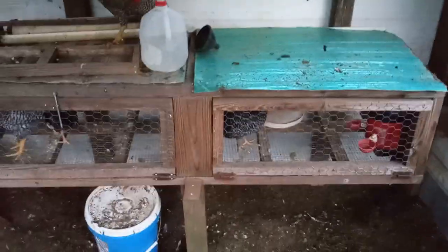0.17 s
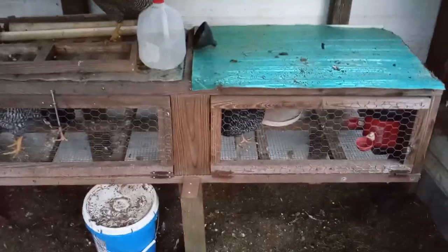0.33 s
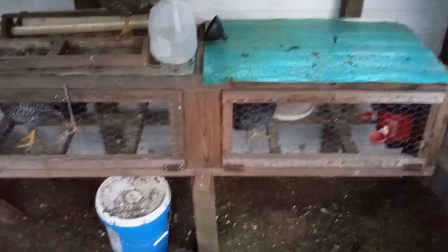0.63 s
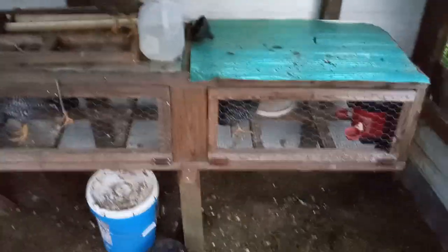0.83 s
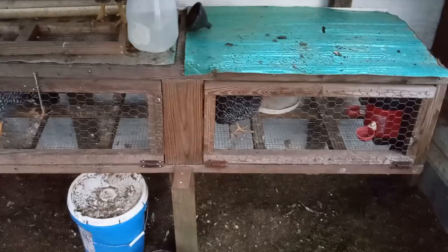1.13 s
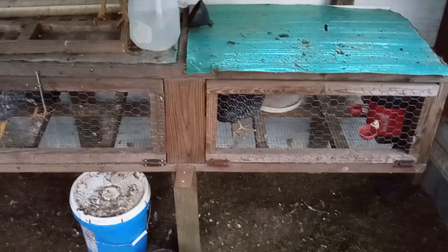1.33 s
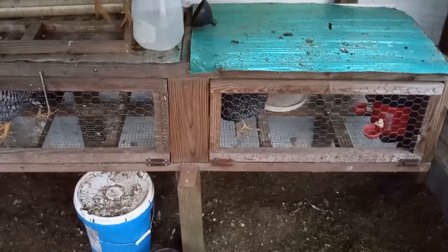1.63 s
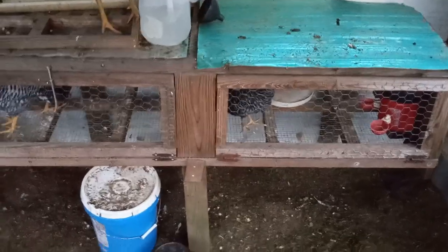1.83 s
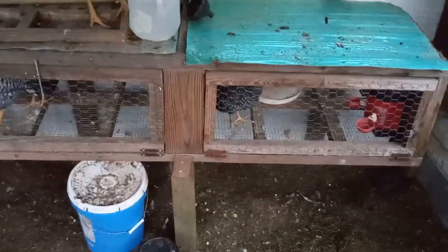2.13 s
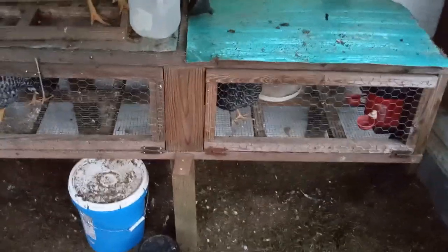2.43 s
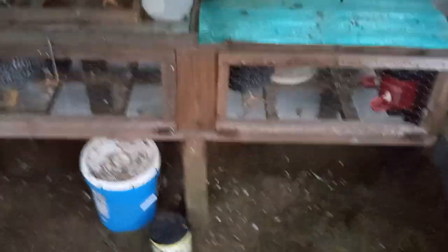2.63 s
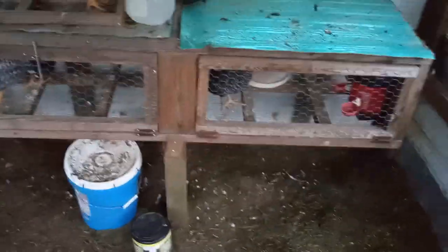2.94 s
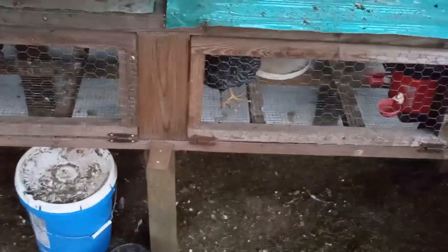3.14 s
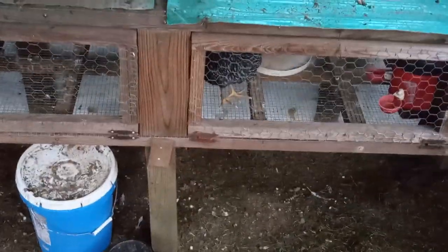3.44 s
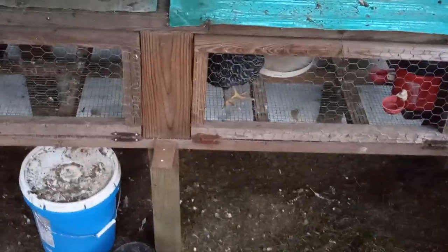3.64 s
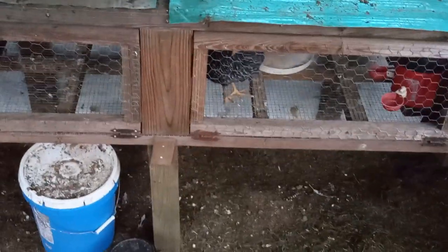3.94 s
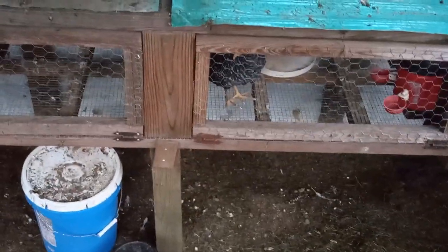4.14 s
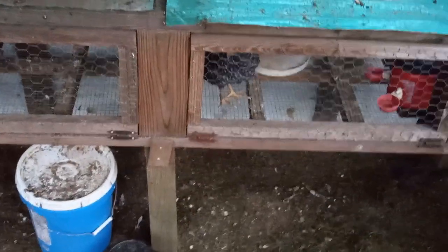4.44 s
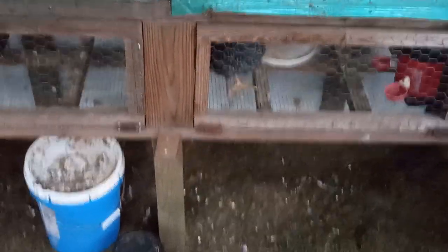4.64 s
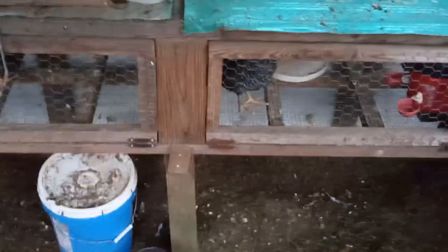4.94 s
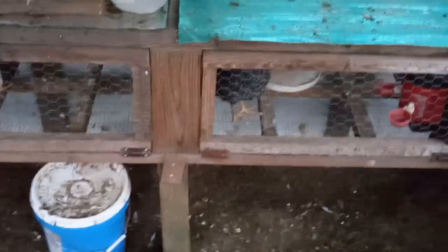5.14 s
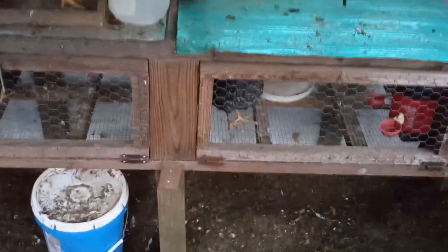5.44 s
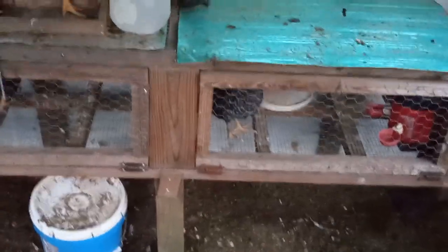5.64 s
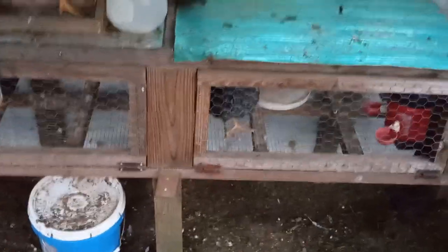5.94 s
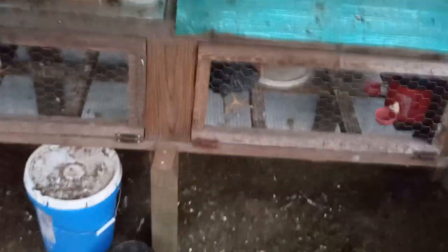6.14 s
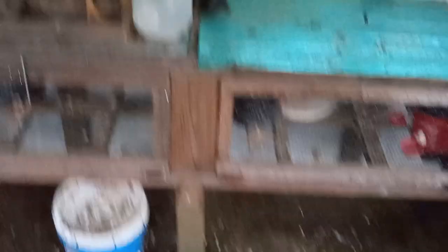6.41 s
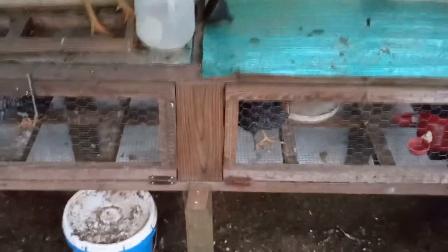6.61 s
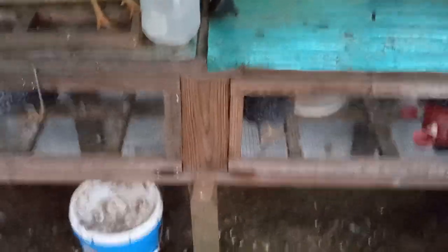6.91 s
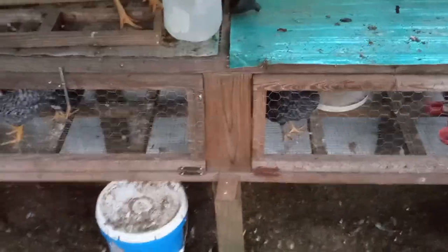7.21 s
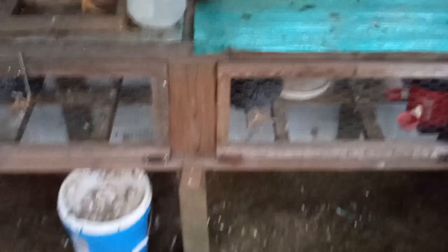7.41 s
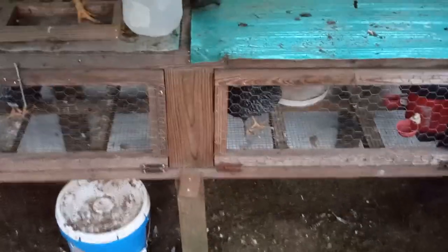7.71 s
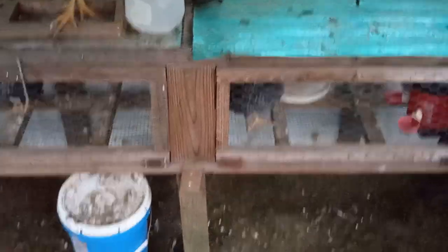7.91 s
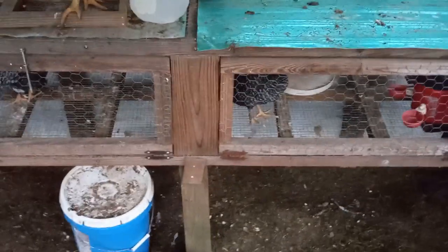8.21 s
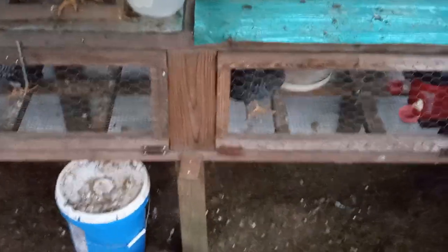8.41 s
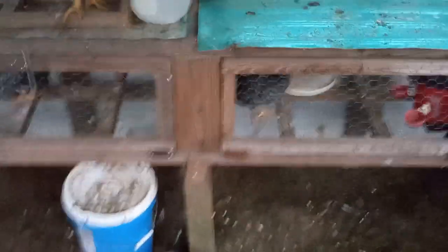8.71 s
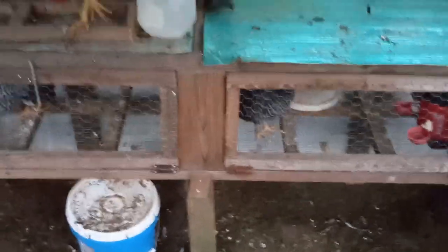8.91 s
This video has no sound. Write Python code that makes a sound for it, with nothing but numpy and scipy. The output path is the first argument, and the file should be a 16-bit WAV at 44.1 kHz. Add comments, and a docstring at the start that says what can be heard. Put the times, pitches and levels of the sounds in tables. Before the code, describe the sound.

Close by in a small shed, claws rattle wire mesh and bump wooden boards while young chickens peep and squawk, mostly on the left. A far bird chirps faintly and a hen clucks twice. Then comes a run of falling peeps and brief squawks with soft coos, followed by quick low clucks and one last knock and rattle. The handheld microphone picks up a few dull thumps and quiet outdoor hiss.

```python
"""Young chickens peep and squawk in a wood and wire hutch inside a shed; a hen clucks, with soft coos.
Peeps are falling, nearly pure tones shaped by the throat; squawks are membrane pulses that break into
a rasp. Feet ring the boards and rattle the mesh; handling of the microphone adds low, dull thumps.
A far bird chirps over a low hum and the hiss of the yard."""
import sys
import numpy as np
from scipy import signal
from scipy.fft import rfft, irfft, next_fast_len
from scipy.io import wavfile
from scipy.ndimage import uniform_filter1d

SR = 44100
rng = np.random.default_rng(int(sys.argv[2]) if len(sys.argv) > 2 else 0)


def transcribe(signal):
    """Save signal, clipped to [-1, 1], as a 16-bit WAV file at the path in sys.argv[1]."""
    frames = np.atleast_2d(signal).T
    limited = np.clip(frames, -1, 1)
    pcm = np.round(limited * 32767).astype(np.int16)
    wavfile.write(sys.argv[1], SR, pcm)


N = 399546


def from_db(db):
    return 10 ** (np.asarray(db) / 20)


def unit_rms(x):
    return x / np.sqrt(np.mean(x ** 2) + 1e-20)


def phase_of(hz):
    return 2 * np.pi * np.cumsum(hz) / SR


def at_hz(points, hz):
    points = np.array(points)
    return np.interp(np.log(hz), np.log(points[:, 0]), points[:, 1])


def span(rows):
    """Samples covered by timed rows, an edge fade, and the interpolated columns."""
    s, *columns = np.transpose(rows)
    at = np.arange(max(round(s[0] * SR), 0), min(round(s[-1] * SR), N))
    fade = np.clip(np.minimum(at - at[0], at[-1] - at) / (0.0051 * SR), 0, 1)
    return at, fade, [np.interp(at / SR, s, c) for c in columns]


def drift(rate_hz, size):
    """Low-passed noise, RMS 1."""
    r = np.exp(-2 * np.pi * rate_hz / SR)
    return unit_rms(signal.lfilter([1], [1, -2 * r, r * r], rng.standard_normal(size + 9000))[9000:])


def band(x, low_hz, high_hz):
    edges = [max(low_hz, 10), min(high_hz, SR * .45)]
    return signal.sosfilt(signal.butter(2, edges, "band", fs=SR, output="sos"), x)


def around(x, hz, width_hz):
    return band(x, hz - width_hz / 2, hz + width_hz / 2)


def third_octaves(noises, spectrum, lowest_hz):
    """Yields (centre Hz, weighted band), alternating between two noises."""
    for k, low in enumerate(lowest_hz * 2 ** np.arange(0, np.log2(16500 / lowest_hz), 1 / 3)):
        hz = low * 2 ** (1 / 6)
        yield hz, from_db(at_hz(spectrum, hz)) * band(noises[k % 2], low, low * 2 ** (1 / 3))


def spread(pair, correlation):
    """Stereo from a shared and an opposed part."""
    return np.sqrt(1 + correlation) * pair[0] + np.sqrt(1 - correlation) * pair[1] * [[1], [-1]]


# Throat response. Each row: frequency in Hz, gain in dB.
THROAT_GAINS = [(1000, 2), (1350, 3), (1600, 5.5), (1850, 0.5), (2150, -3.5), (2450, 1), (2800, -6),
                (3150, -8), (3600, -14.5), (4000, -5.5), (4300, -8.5), (4650, -6), (5200, -15), (6300, -8),
                (7000, -8), (7600, -20.5), (9000, -38)]


def throat_db(hz):
    return at_hz(THROAT_GAINS, hz)


def whistle(contour, second_db, upper_db, flutter=0, waver_db=3, flutter_hz=415, break_hz_per_s=22000):
    """Tone along (s, Hz, dB) rows; the throat shapes overtones, flutter adds sidebands and breath."""
    at, fade, (hz, db) = span(contour)
    out, n = np.zeros(N), len(at)
    hz = uniform_filter1d(hz, size=500, mode="nearest")
    # Pitch clings to windpipe resonances; the voice breaks in fast glides.
    hz -= 85 * np.clip((hz - 1640) / 200, 0, 1) * np.sin(2 * np.pi * hz / 820)
    broken = uniform_filter1d(np.clip(np.abs(np.gradient(hz)) * SR / break_hz_per_s, 0, 1), size=400)
    phase = phase_of(hz * (1 + 0.01193 * drift(67.6, n)))
    tone = (1 + .5 * broken * drift(150, n)) * np.sin(phase + 0.53 * broken * drift(150, n))
    tone *= from_db(0.63 * throat_db(hz))
    overtone_gain = np.clip((2900 - hz) / 500, .15, 1) * (1 - .7 * broken)
    for k, level_db in ((2, second_db), (3, upper_db), (5, upper_db)):
        gain = overtone_gain * from_db(level_db + 1.66 * throat_db(k * hz) + 3.14 * drift(17, n))
        tone += gain * np.sin(k * phase + 2.5 * flutter * drift(200, n))
    depth = flutter * np.clip((2100 - hz) / 450, .06, 1)
    flutter_phase = phase_of(flutter_hz * (1 + 0.018 * drift(32, n)))
    for k in range(1, 5):
        gain = depth * 0.95 ** k * from_db(throat_db(hz + k * flutter_hz) + 4 * drift(28, n))
        tone += gain * np.sin(phase + k * flutter_phase)
    breath = band(band(rng.standard_normal(n), 2100, 4500), 2100, 4500)
    tone += depth * from_db(-16) * unit_rms(breath)
    out[at] = np.sqrt(2) * fade * from_db(db + waver_db * drift(39, n)) * tone
    return out


def swell(s, length_s, hz, db, sag=0.018):
    """Soft tone that swells and fades on a sagging pitch."""
    steps = [(0, -11), (0.28, 0), (0.42, -4.5), (1, -14.5)]
    contour = [(s + share * length_s, hz * (1 + sag * (.5 - share)), db + rel_db)
               for share, rel_db in steps]
    return whistle(contour, second_db=-34, upper_db=-36.5)


# Each row: start in seconds, length in seconds, pitch in Hz, level in dB.
COO_NOTES = [(-.05, 0.098, 334, -50.5), (0.325, 0.14, 330.4, -59), (2.264, 0.11, 863, -69),
             (2.489, 0.07, 834, -55.5), (4.93, 0.18, 612, -73), (5.537, 0.4, 517.7, -64.5),
             (6.687, .3, 513, -62.5), (7.373, 0.12, 248.5, -61.5), (7.62, 0.4, 515, -65.5),
             (8.297, 0.12, 585, -59.5)]


def coos():
    """Soft, nearly pure voiced notes."""
    return sum(swell(*row) for row in COO_NOTES)


# Hiss spectrum. Each row: frequency in Hz, relative level in dB.
HISS_SPECTRUM = [(25, -26.5), (60, -12.5), (110, -13), (160, -17), (300, -19), (900, -23.5), (1350, -31),
                 (2500, -19.5), (3400, -31.5), (3800, -27.5), (4200, -33.5), (4700, -36), (5500, -38),
                 (8000, -39), (9000, -51.5), (16000, -44)]
# Hiss width. Each row: frequency in Hz, left-right correlation.
HISS_CORRELATION = [(60, 0.65), (380, 0.53), (2380, -0.3), (15000, 0.063)]
# Hum. Each row: centre in Hz, width in Hz, level in dB.
DRONES = [(84.6, 5.6, -80.5), (112.7, 12.1, -72), (896, 57, -85), (2613, 330, -83)]


def yard(hiss_db=-70):
    """Patchy stereo hiss and narrow, wavering drones."""
    hiss = hum = 0
    for hz, pair in third_octaves(rng.standard_normal((2, 2, N)), HISS_SPECTRUM, 25.42):
        hiss += from_db(3.9 * drift(9.3, N)) * spread(pair, at_hz(HISS_CORRELATION, hz))
    for hz, width_hz, db in DRONES:
        gain = from_db(db + 4.03 * drift(1.2, N))
        hum += gain * unit_rms(around(rng.standard_normal(N), hz, width_hz))
    return from_db(hiss_db) * unit_rms(hiss) + hum


def squawk_contour(s, lead_s, drop_s, onset_hz, high_hz, low_hz, lead_db, db):
    """The throat opens; its resonance holds, drops and is cut short. Returns (s, Hz, dB) rows."""
    low_s = s + lead_s + drop_s
    lead_in = [(s, onset_hz, lead_db - 16.5), (s + 0.35 * lead_s, high_hz, lead_db - 7),
               (s + lead_s, high_hz, lead_db)]
    tail = [(0, 0), (0.02, 0), (0.038, -19.5), (0.098, -51)]
    return lead_in + [(low_s + after_s, low_hz, db + rel_db) for after_s, rel_db in tail]


# Each row: start, lead-in and drop in seconds; onset, high and low resonance in Hz;
# lead-in and post-drop level in dB.
SQUAWK_CALLS = [(0.029, 0.1, 0.026, 2300, 3045, 1629, -40.5, -35.5),
                (2.44, 0.02, 0.035, 2800, 2970, 2170, -46, -49),
                (2.62, 0.12, 0.021, 2300, 3047, 1669, -47.5, -43.5),
                (5.341, 0.12, 0.043, 3250, 2990, 1724, -44.5, -45),
                (6.029, .165, .032, 2100, 2902, 1485, -51.5, -49),
                (6.359, 0.13, 0.031, 2100, 3040, 1646, -45.5, -37),
                (7.038, 0.18, 0.031, 2000, 2470, 1960, -48.5, -45.5)]
# Upper throat resonances. Each row: centre in Hz, width in Hz, relative level in dB.
RASP_BANDS = [(3045, 590, 5), (4170, 600, 4), (7230, 520, -21), (9870, 570, -21)]


def squawks(pulse_hz=415, width_hz=300, smear_hz=130):
    """Membrane pulses under a falling resonance; the voice breaks into a rasp as it drops."""
    out = np.zeros(N)
    for row in SQUAWK_CALLS:
        at, fade, (hz, db) = span(squawk_contour(*row))
        n = len(at)
        fallen_hz = np.maximum.accumulate(hz) - hz
        rough = np.clip(.15 + fallen_hz / 2400 + max(2900 - hz.max(), 0) / 1300, 0, 1)
        phase = phase_of(pulse_hz * from_db(rng.normal(0, .3)) * (1 + 0.0202 * drift(40.9, n)))
        sweep = np.exp(1j * phase_of(hz * (1 + 0.008 * drift(66, n))))
        voiced = 1.9 * sweep.real * np.clip((db - db[0]) / 12, 0, 1) ** 2   # whistles when strong
        for k in range(2, 9):
            detune = (k * pulse_hz - hz) / width_hz
            resonance = 1 / (1 + (detune * np.where(detune > 0, 1.3, .62)) ** 2) ** 1.35
            voiced += resonance * from_db(5 * drift(36, n) - 5) * np.sin(k * phase + .7 * drift(90, n))
        chaos = drift(smear_hz, n) + 1j * drift(smear_hz, n)
        tone = ((1 - rough) * voiced + rough * np.real(chaos * sweep)) / np.hypot(1 - rough, rough)
        near_peak = np.clip((db - db.max()) / 5 + 1.5, 0, 1) ** 2
        tone += from_db(-25) * rough * near_peak * np.real(chaos * (sweep ** 2 + sweep ** 3))
        throat = from_db(0.38 * throat_db(np.arange(1, n // 2 + 2) * SR / n))
        tone = band(irfft(rfft(tone) * throat, n), 750, 6700)
        breath = rng.standard_normal(n) * (1 + .8 * np.cos(phase))
        rasp = sum(from_db(band_db + 4.3 * drift(40, n)) * unit_rms(around(breath, mid_hz, wide_hz))
                   for mid_hz, wide_hz, band_db in RASP_BANDS)
        out[at] += fade * from_db(db) * (tone + from_db(-30.5 + 13.6 * rough) * rasp)
    return out


# Each row: start, lead-in, drop and tail in seconds; high, knee and end pitch in Hz;
# lead-in and post-drop level in dB; flutter from 0 to 1.
PEEP_CALLS = [(0.249, 0.015, 0.025, 0.0755, 2870, 2000, 1565, -66, -63.5, 0.15),
              (.58, 0.04, .15, 0.06, 3000, 1707, 1492, -44.5, -53.5, 0.72),
              (.96, 0.017, 0.052, 0.038, 2930, 1700, 1443, -36, -48, 0.65),
              (2.002, 0.07, 0.085, 0.086, 2873, 1664, 1565, -51.5, -55.5, 0.09),
              (2.369, 0.033, 0.042, 0.084, 2993, 1923, 1290, -39.5, -50, 0.7),
              (4.93, 0.015, 0.099, 0.11, 3100, 1560, 1359, -68.5, -54.5, 0.05),
              (5.035, 0.018, 0.039, .18, 3130, 2950, 2800, -66, -60.5, .1),
              (5.054, 0.12, 0.052, 0.067, 2440, 2037, 1917, -59, -54.5, 0.37),
              (5.25, 0.049, 0.043, 0.12, 3164, 1619, 1279, -49, -53.5, 0.42),
              (5.611, .07, 0.045, 0.1, 3180, 1666, 1274, -47.5, -51, 0.36),
              (6.691, 0.053, 0.092, 0.094, 3075, 1637, 1513, -55, -48, 0),
              (7.043, 0.067, 0.055, 0.084, 3100, 1793, 1557, -46.5, -44.5, 0.2),
              (7.428, 0.081, 0.049, 0.06, 3184, 1888, 1664, -44.5, -45, 0.44),
              (8.939, 0.069, 0.068, .04, 3100, 1990, 1700, -46, -53, 0.4)]


def peeps():
    """A high whistle swells, drops to a knee and settles as it dies."""
    out = np.zeros(N)
    for s, lead_s, drop_s, tail_s, high_hz, knee_hz, end_hz, lead_db, db, flutter in PEEP_CALLS:
        knee_s = s + lead_s + drop_s
        contour = [(s, 1.05 * high_hz, lead_db - 16), (s + lead_s, high_hz, lead_db),
                   (knee_s, knee_hz, db),
                   (knee_s + 0.35 * tail_s, knee_hz + .7 * (end_hz - knee_hz), db + 2),
                   (knee_s + 0.804 * tail_s, end_hz, db - 5.5), (knee_s + tail_s, end_hz, db - 31)]
        out += whistle(contour, second_db=-2.5, upper_db=-19, flutter=flutter)
    return out


# Claw blows. Each row: time in seconds, level in dB, treble in dB, T60 at 3 kHz in seconds.
CLAW_BLOWS = [(0.47, -46.5, -10, 0.25), (0.665, -26.5, -16, 0.14), (0.842, -37, 4.5, 0.55),
              (0.9075, -29, -36, 0.1), (0.9714, -32.5, -6, 0.21), (1.0303, -39, -46, 0.081),
              (1.054, -43.5, -5, 0.068), (1.237, -43.5, -9, 0.22), (1.3137, -33, -9, 0.068),
              (1.53, -47, -12.5, 0.12), (1.6318, -43, -84, 0.057), (1.7942, -24, -11, 0.15),
              (2.322, -50, -16, 0.33), (2.355, -19.5, -22.5, 0.1), (7.34, -63, -6, 0.43),
              (7.982, -50, -42, 0.27), (8.997, -27, -10.5, 0.3)]
# Wire spectrum. Each row: frequency in Hz, relative level in dB.
MESH_SPECTRUM = [(410, -38), (700, -21), (897, -15.5), (1280, -12), (1740, -11.5), (2010, -12.5),
                 (3390, -14), (6180, -14.5), (8020, -26), (14800, -25.5), (15800, -53.5)]


def mesh(drag, scatter_db=3):
    """Claws shake dense clicks from the mesh; each blow rings other wires, and treble dies first."""
    clicks = rng.standard_normal((2, 2, N)) * from_db(1.52 * rng.exponential(1, (2, 1, N)))
    parts = list(third_octaves(clicks, MESH_SPECTRUM, 800))
    total_rms = np.sqrt(np.mean(sum(part for _, part in parts) ** 2))
    out, t = 0, np.arange(int(.4 * SR)) / SR
    for hz, part in parts:
        force = drag.copy()
        for s, db, treble_db, t60_s in CLAW_BLOWS:
            at = round((s - .003) * SR)
            tilt_db = (treble_db + 10) * np.clip(np.log2(hz / 4500), 0, 1)
            decay_db = 60 * t / t60_s * (hz / 3000) ** 0.24
            attack = np.minimum(t / (0.07 * t60_s), 1)
            blow = attack * from_db(db - 7.5 + tilt_db + rng.normal(0, scatter_db) - decay_db)
            force[at:at + len(t)] += blow[:N - at]
        out += force * part / total_rms
    return spread(out, correlation=0.043) * from_db([[-1.5], [1.5]])


# Each row: time in seconds, level in dB, brightness in dB per octave.
FOOTFALLS = [(0.665, -34, 12), (0.88, -39.5, -4), (0.909, -28.5, 15), (0.973, -34, 3), (1.03, -31.5, 8.5),
             (1.243, -26.5, 5.5), (1.275, -35, 5), (1.796, -27, 8), (2.357, -30.5, 3), (7.161, -57, 0.5),
             (9.002, -37, -2.5)]
# Each row: frequency in Hz, gain in dB.
BOARD_MODES = [(225, -5.5), (258, 1.5), (335, 0), (415, -5), (510, -10), (600, -10), (690, -10.5),
               (770, -15.5), (900, -14.5)]


def boards(drag, attack_s=0.003995, foot_t60_s=0.1):
    """Brief, uneven foot pressure drives each board mode; low modes ring longer."""
    out, t = np.zeros(N), np.arange(SR // 10) / SR
    pressure = np.minimum(t / attack_s, 1) * from_db(-60 * t / foot_t60_s)
    for hz, mode_db in BOARD_MODES:
        force = from_db(-13) * drag * rng.standard_normal(N)
        for s, db, bright_db in FOOTFALLS:
            at = round((s - attack_s) * SR)
            gain = from_db(db - 27 + bright_db * np.log2(hz / 400) + rng.normal(0, 1))
            force[at:at + len(t)] += (gain * pressure * rng.standard_normal(len(t)))[:N - at]
        t60_s = 0.11 * (400 / hz) ** .2
        r, w = from_db(-60 / (t60_s * SR)), 2 * np.pi * hz / SR
        ring = signal.lfilter([1, 0, -1], [1, -2 * r * np.cos(w), r * r], force + 1e-18)
        out += from_db(mode_db) * ring / 2
    return band(band(out, 130, 1500), 130, 1500)


# Each row: start and length in seconds, board and mesh level in dB, rise as a share of the length,
# level change after the rise in dB.
FOOT_DRAGS = [(0.671, 0.2, -59.5, -52, 0.23, -28.5), (0.832, 0.69, -58.5, -55.5, 0.022, -11.5),
              (6.995, 0.39, -84, -87, 0.2, 2), (7.974, 0.55, -74.5, -76, 0.018, -23.5)]


def shuffling(edge_db=-25.5, burst_db=5.5):
    """Force of dragging feet on boards and on mesh, in uneven bursts."""
    out = np.zeros((2, N))
    for s, length_s, boards_db, mesh_db, rise, change_db in FOOT_DRAGS:
        steps = [(0, edge_db), (rise, 0), (0.75, change_db), (1, change_db + edge_db)]
        at, fade, (db,) = span([(s + share * length_s, rel_db) for share, rel_db in steps])
        surface_db = np.array([[boards_db], [mesh_db]])
        out[:, at] += fade * from_db(db + surface_db + burst_db * drift(34, len(at)))
    return out


# Each row: start in seconds, length in seconds, pitch in Hz, level in dB.
HANDLING_THUMPS = [(0.872, 0.26, 109, -45.5), (1.783, 0.069, 134, -51), (7.154, 0.031, 150, -50.5),
                   (7.24, 0.077, 152, -60)]


def handling():
    """Low, dull handling thumps on the microphone."""
    return sum(swell(*row) for row in HANDLING_THUMPS)


# Each row: start in seconds, pitch in Hz, level in dB, hold in seconds, roughness from 0 to 1,
# brightness in dB per octave.
HEN_CLUCKS = [(1.939, 239, -49.5, 0.0078, 0.52, 2.5), (2.085, 245, -49, 0.012, 0.4, 0.5),
              (4.419, 248, -44.5, 0.015, 0.52, -1), (4.573, 255.8, -43.5, 0.022, 0.56, -2),
              (7.811, 250, -43.5, 0.02, 0.67, -1), (7.886, 251.5, -41.5, 0.013, 0.49, -3.5),
              (7.965, 261.4, -37.5, 0.027, 0.43, -4), (8.019, 274.4, -41.5, 0.031, 0.77, 0),
              (8.102, 308.3, -37.5, 0.015, 0.7, -9), (8.126, 317, -41, 0.01, 0.6, -2.5),
              (8.188, 286.5, -51, 0.041, 0.55, 5.5), (8.268, 301, -46, 0.023, 0.46, 2.5),
              (8.843, 258, -42.5, 0.017, 0.7, -2.5)]
# Each row: frequency in Hz, harmonic gain in dB.
HEN_THROAT = [(250, 0), (560, 0), (780, -3), (880, -24), (1400, -26)]


def clucks(attack_s=0.014, t60_s=0.12, rise_per_s=0.18, breath_hz=82.5, scatter_db=1.5):
    """Voiced puffs: five harmonics of a slightly rising pitch, roughened by uneven breath."""
    n = SR // 4
    out, t = np.zeros(N + SR), np.arange(n) / SR
    for s, hz, db, hold_s, rough, bright_db in HEN_CLUCKS:
        phase = phase_of(hz * (1 + rise_per_s * t + 0.028 * drift(30, n)))
        decay_db = 60 * np.maximum(t - attack_s - hold_s, 0) / t60_s
        envelope = np.minimum(t / attack_s, 1) ** 2 * from_db(db - decay_db)
        for k in range(1, 6):
            breath = (drift(breath_hz, n) + 1j * drift(breath_hz, n)) / np.sqrt(2)
            wobble = (1 - rough + rough * breath) / np.hypot(1 - rough, rough)
            gain = from_db(at_hz(HEN_THROAT, k * hz) + bright_db * np.log2(k) + rng.normal(0, scatter_db))
            out[round(s * SR):][:n] += gain * envelope * np.real(wobble * np.exp(1j * k * phase))
    return band(out[:N], 170, 940)   # throat passband


# Each row: start in seconds, level in dB.
CLAW_TICKS = [(2.564, -48.5), (4.6646, -36), (4.924, -53), (7.001, -59), (7.136, -41), (7.801, -33.5),
              (8.4145, -51.5)]


def ticks(t60_s=0.03):
    """Light taps of claw on wire: short, bright noise bursts."""
    out, t = np.zeros(N), np.arange(400) / SR
    for s, db in CLAW_TICKS:
        out[round(s * SR):][:len(t)] = from_db(db - 19.5 - 60 * t / t60_s) * rng.standard_normal(len(t))
    return band(out, 2100, 20000)


# Each row: start in seconds, level in dB.
CHIRPS = [(s, -67) for s in 2.885 + .215 * np.arange(5)]


def far_bird():
    """Evenly spaced whistles, each sliding down."""
    contours = [[(s, 3800, db - 11), (s + 0.024, 3280, db), (s + 0.065, 2950, db - 3.5)]
                for s, db in CHIRPS]
    return sum(whistle(contour, second_db=-35, upper_db=-47, waver_db=4) for contour in contours)


def shed(x, t60_s=0.12, wall_cut_hz=5160):
    """Wall echoes: eight feedback delays a side, duller on every round."""
    size = next_fast_len(N + SR)
    w = 2 * np.pi * np.arange(size // 2 + 1) / size
    response = np.zeros((2, len(w)), complex)
    wall = 1 / (1 + 1j * w * SR / (2 * np.pi * wall_cut_hz))
    for k, lag in enumerate((rng.uniform(.005, .025, 16) * SR).astype(int)):
        trip = from_db(-60 * lag / SR / t60_s) * wall * np.exp(-1j * w * lag)
        response[k % 2] += trip / (1 - trip) * (-1) ** (k // 2)
    response /= np.sqrt(np.mean(np.abs(response) ** 2, axis=1, keepdims=True))
    return irfft(response * rfft(x, size), size)[:, :N]


# Bird bearing. Each row: time in seconds, left minus right in dB.
BIRD_PAN = [(0, 3.5), (2.5, 10.5), (5.002, 7), (6, 10), (9.06, 7.5)]


def scene():
    """High calls shift about on the left and reach the right later; low sounds sit in the middle."""
    board_drag, mesh_drag = shuffling()
    birds = peeps() + squawks() + far_bird()
    low = coos() + handling() + boards(board_drag) + clucks()
    side_db = np.interp(np.arange(N) / SR, *np.transpose(BIRD_PAN)) / 2
    panned = np.array([birds * from_db(side_db), np.roll(birds, shift=6) * from_db(-side_db)])
    wire = mesh(mesh_drag) + ticks()
    echoes = from_db(-4.5) * shed(birds + wire[0] + from_db(-7) * low)
    return panned + low + wire + echoes + yard()


def record(dry, port_hz=15750, low_cut_hz=48, high_cut_hz=16100):
    """The microphone port rings in the high treble; deep bass and the very top are cut."""
    ring = from_db(4) * around(dry, port_hz, width_hz=2300)
    body = signal.sosfilt(signal.butter(2, low_cut_hz, "high", fs=SR, output="sos"), dry)
    return signal.sosfilt(signal.cheby2(14, 60, high_cut_hz, fs=SR, output="sos"), body + ring)


dry = scene()
out = record(dry)
transcribe(out)
```